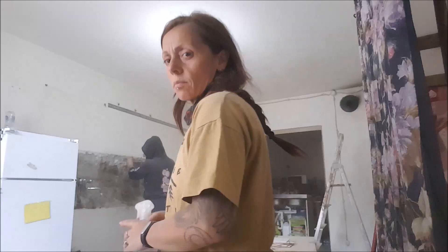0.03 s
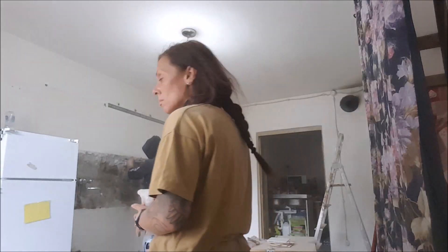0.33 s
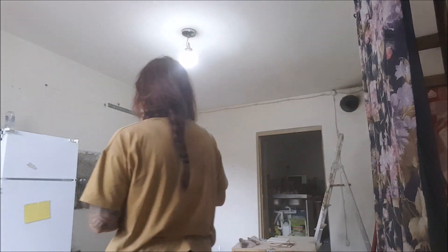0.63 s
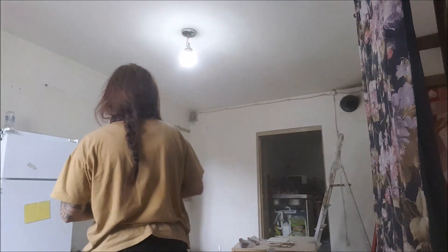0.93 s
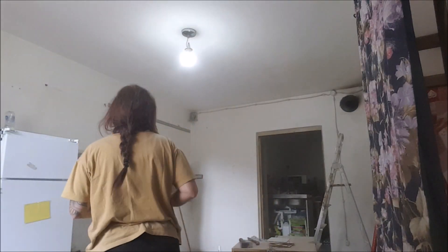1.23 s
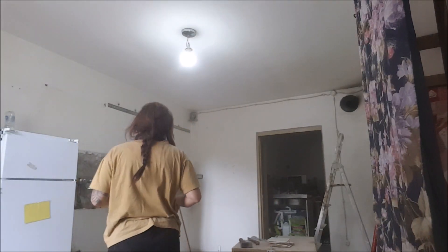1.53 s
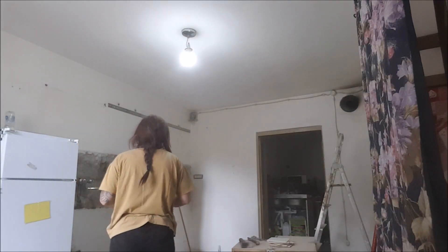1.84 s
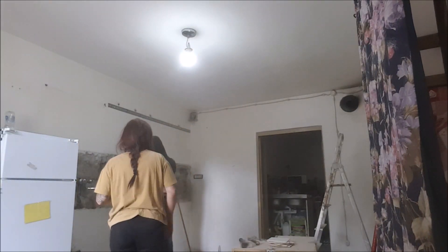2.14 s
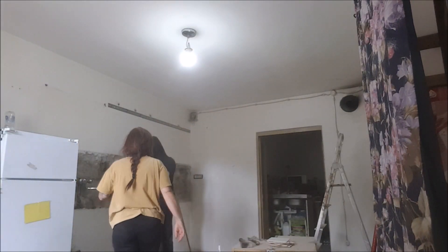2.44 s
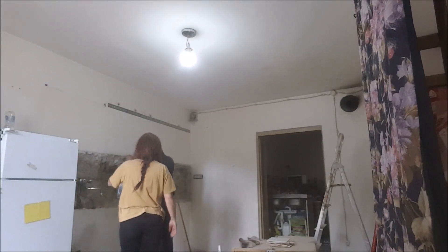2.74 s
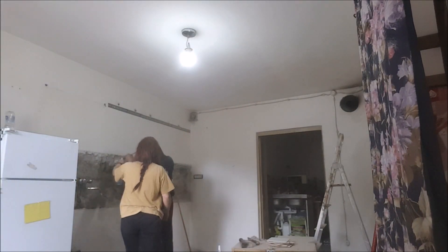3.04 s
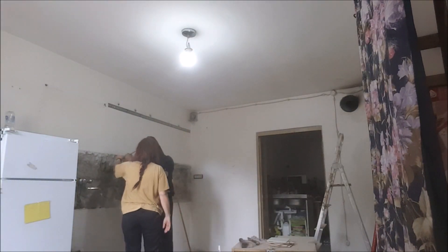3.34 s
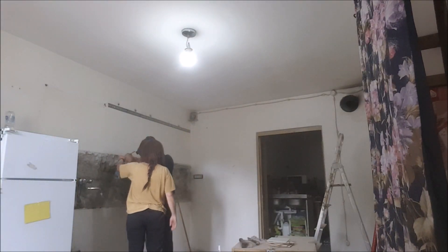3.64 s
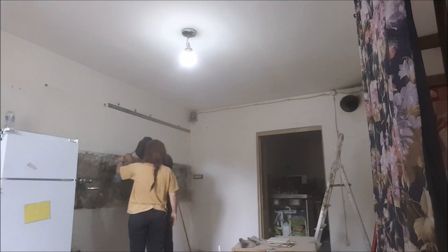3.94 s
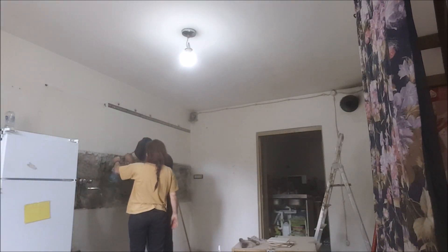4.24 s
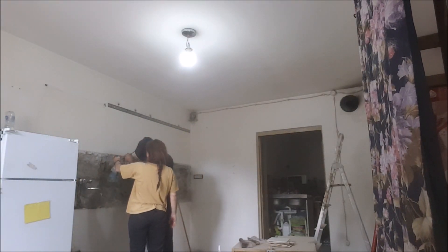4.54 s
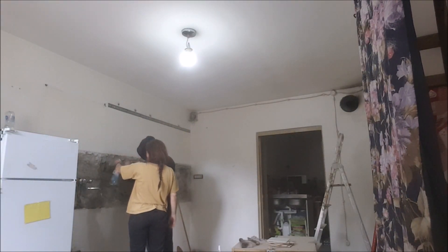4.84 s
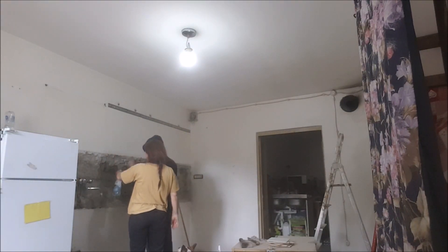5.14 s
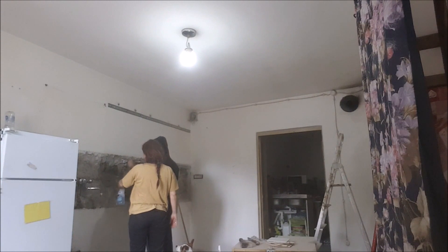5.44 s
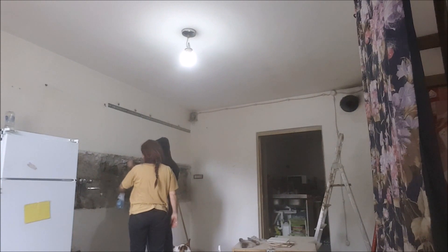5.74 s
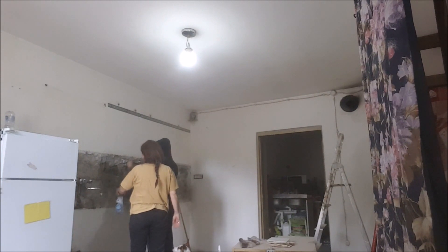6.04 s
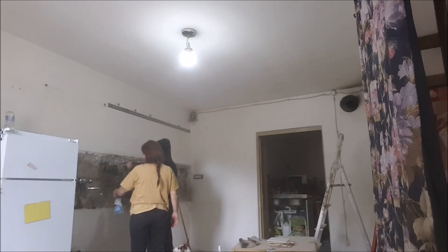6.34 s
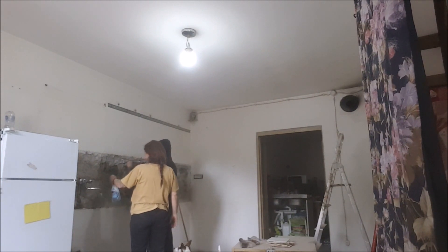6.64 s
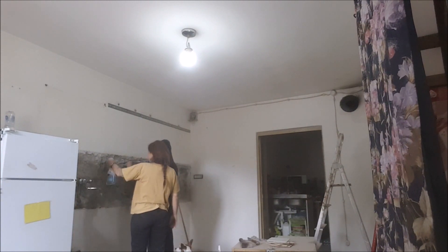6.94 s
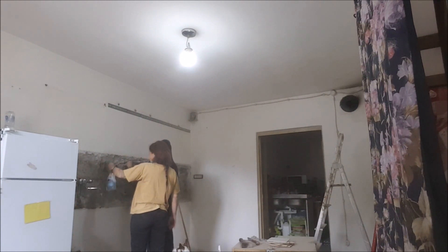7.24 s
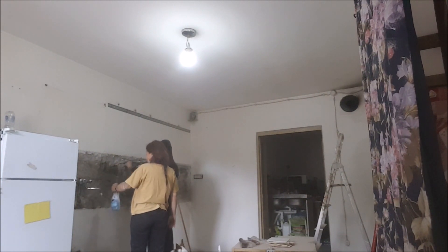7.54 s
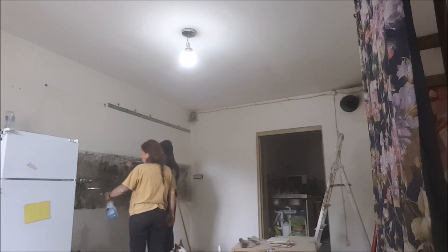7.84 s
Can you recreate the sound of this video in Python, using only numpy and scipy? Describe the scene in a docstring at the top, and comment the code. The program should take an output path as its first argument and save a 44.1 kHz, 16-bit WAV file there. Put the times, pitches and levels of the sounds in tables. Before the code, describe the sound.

A hammer and chisel crack steadily against a plaster wall, pause while a spray bottle softly pumps, then start again.

```python
"""A bare, ringing kitchen, heard in stereo from a phone a few metres off a plastered wall.
A hammer hits a chisel: the edge cracks, the steel rings, the wall thuds. A trigger bottle hisses
water on the dust twice. From 1.1 s come ten more blows, three bringing down a shower of plaster.
From 4 s the bottle pumps steadily; faint squeaks, steps and small knocks show as the hammer rests.
At 6.2 s it starts again for five last blows."""
import sys
import numpy as np
from scipy import signal
from scipy.fft import rfft, irfft, next_fast_len
from scipy.io import wavfile
from scipy.ndimage import uniform_filter1d

SR = 44100
rng = np.random.default_rng(int(sys.argv[2]) if len(sys.argv) > 2 else 0)


def transcribe(signal):
    """Save signal, clipped to [-1, 1], as a 16-bit WAV file at the path in sys.argv[1]."""
    frames = np.atleast_2d(signal).T
    limited = np.clip(frames, -1, 1)
    pcm = np.round(limited * 32767).astype(np.int16)
    wavfile.write(sys.argv[1], SR, pcm)


N = 347949
T = np.arange(SR) / SR  # one second, the life of any event
HZ = np.fft.rfftfreq(2 * SR, 1 / SR)


def amp(db):
    """Decibels to amplitude."""
    return 10 ** (np.asarray(db) / 20)


def unit(x):
    """Scale to an rms of one."""
    return x / np.sqrt(np.mean(x ** 2) + 1e-20)


def at_level(x, db):
    """Scale an event so that its first tenth of a second has this rms level."""
    return amp(db) * x / np.sqrt(np.mean(x[..., :SR // 10] ** 2) + 1e-20)


def along(points, hz):
    """Read a curve of (frequency [Hz], value) points on a log axis."""
    freqs, values = np.transpose(points)
    return np.interp(np.log(hz + 1), np.log(freqs + 1), values)


def add(track, s, x):
    """Mix x into the track from time s."""
    part = track[:, max(0, round(s * SR)):][:, :x.shape[-1]]
    part += x[..., :part.shape[1]]


def coloured(x, gain):
    """Causal (minimum phase) filter with this gain at the frequencies HZ."""
    cepstrum = irfft(np.log(np.maximum(gain, 1e-6)))
    cepstrum[1:SR] *= 2
    cepstrum[SR + 1:] = 0
    return irfft(rfft(x, 2 * SR) * np.exp(rfft(cepstrum)))[..., :SR]


def contact(crunch, life_s):
    """A sharp push, then a brief crunch of grit; crunch is its size beside the push."""
    grit = rng.standard_normal(SR) * np.exp(-T / life_s)
    return (T == 0) + crunch * grit / np.linalg.norm(grit)


# How alike the two microphones hear the room: (frequency [Hz], correlation [0-1])
MIC_LIKENESS = [(60, 0.95), (140, 0.92), (290, 0.47), (640, 0.53), (1400, 0), (15000, 0.025)]
def diffuse(size, spectrum):
    """Noise from all sides at two microphones: alike in the bass, unrelated in the treble."""
    hz = np.fft.rfftfreq(size, 1 / SR)
    turn = np.arccos(np.clip(along(MIC_LIKENESS, hz), -1, 1)) / 2
    noise = rfft(rng.standard_normal((2, size))) * amp(along(spectrum, hz))
    mid, side = irfft(noise * [np.cos(turn), np.sin(turn)], size)
    return unit(np.array([mid + side, mid - side]))


# The kitchen's decay: (frequency [Hz], t60 [s])
ROOM_DECAY = [(100, 0.87), (400, 0.57), (900, 0.53), (2500, 0.44), (4500, 0.42), (7500, 0.33), (11000, 0.3),
              (15000, 0.23)]
# At the microphones, the first wave, then a bunch from floor and ceiling: (time [s], gain [dB])
ARRIVALS = [(0, -30), (.0022, -6), (.0045, 1.5), (.006, 1.5), (.008, -2), (.012, 1.5), (.019, -2), (.06, 0)]
def in_room(x, gain):
    """Colour a source and hear it across the kitchen: two swells, then a tail whose treble dies first."""
    hz, t, bands = signal.stft(diffuse(SR, [(1, 0)]), SR, nperseg=256)
    decay = amp(-60 * t / along(ROOM_DECAY, hz)[:, None])
    tail = signal.istft(bands * decay, SR, nperseg=256)[1][:, :SR]
    response = tail * amp(np.interp(T, *np.transpose(ARRIVALS)))
    return coloured(signal.fftconvolve(x[None], response, axes=1)[:, :SR], gain)


# Still air in the kitchen: (frequency [Hz], relative density [dB])
AIR_SPECTRUM = [(25, -10), (50, -5.5), (150, -8), (400, -9), (950, -15), (2300, -22.5), (9000, -23),
                (15500, -32.5)]
# Mains hum: (frequency [Hz], level [dB])
MAINS_HUM = [(100, -73), (150, -68.5)]
def room_tone(air_db=-65):
    """Faint air all round the microphones with a trace of mains hum; it fades in at the start."""
    t = np.arange(N) / SR
    hum = sum(amp(db) * np.sqrt(2) * np.sin(2 * np.pi * hz * t) for hz, db in MAINS_HUM)
    fade_in = amp(np.interp(t, [0, .1], [-25, 0]))
    return fade_in * (amp(air_db) * diffuse(N, AIR_SPECTRUM) + hum)


# Faint squeaks: (start [s], length [s], first pitch [Hz], last pitch [Hz], relative level [dB],
# flutter [share of pitch])
FAINT_SQUEAKS = [(1.016, 0.04, 1560, 1470, -66, .09), (5.36, .22, 2317, 2043, -66.5, .04),
                 (6.002, 0.038, 2320, 2440, -69, .05), (6.508, 0.032, 1516, 1480, -66, .09)]
def squeaks(trim_db=3.5):
    """Thin, unsteady tones that glide a little as they swell and fade."""
    out = np.zeros((2, N))
    for s, length, first_hz, last_hz, db, flutter in FAINT_SQUEAKS:
        progress = np.minimum(T / length, 1)
        wobble = unit(uniform_filter1d(rng.standard_normal(SR), size=30))
        pitch = (first_hz + (last_hz - first_hz) * progress) * (1 + flutter * wobble)
        squeak = np.sin(np.pi * progress) * np.sin(2 * np.pi * np.cumsum(pitch) / SR)
        add(out, s, at_level(in_room(squeak, np.ones_like(HZ)), db + trim_db))
    return out


# Small knocks, clicks and soft steps about the room: (time [s], level [dB], centre [Hz])
SMALL_KNOCKS = [(.357, -51.5, 7500), (.52, -58, 1640), (.655, -59, 7500), (.658, -52, 160),
                (.7, -58.5, 2780), (.877, -62, 2420), (2.494, -39.5, 900), (3.697, -42, 2670),
                (5.319, -56.5, 200), (5.395, -61.5, 450), (5.638, -56, 1600), (5.909, -61.5, 160),
                (6.829, -60.5, 91)]
def knocks_and_steps(half_width_octaves=.7):
    """Each light, gritty contact sounds one broad resonance."""
    out = np.zeros((2, N))
    for s, db, hz in SMALL_KNOCKS:
        body = 1 / (1 + (np.log2((HZ + 1) / hz) / half_width_octaves) ** 2)
        add(out, s, at_level(in_room(contact(crunch=0.88, life_s=0.024), body), db))
    return out


# The nozzle's hiss: (frequency [Hz], relative density [dB])
MIST_SPECTRUM = [(150, -23.5), (400, -7), (700, -11), (1300, -6.5), (2400, -5), (5800, -12.5), (9100, -11),
                 (15500, -17)]
# Bouts of pumping: (start [s], end [s], level of the first squeeze [dB])
PUMPING = [(0.349, 0.8, -56), (3.955, 7.35, -54.5)]
def spray_bottle(every_s=.2975, squeeze_s=.12, growth_db_per_s=1.3):
    """The nozzle hisses as each squeeze's pressure swells and falls; the jet grows through a bout."""
    out = np.zeros((2, N))
    pressure = np.sqrt(np.abs(np.sin(np.pi * np.minimum(T / squeeze_s, 1))))
    for start, end, db in PUMPING:
        for s in np.arange(start, end, every_s):
            hiss = in_room(pressure * rng.standard_normal(SR), amp(along(MIST_SPECTRUM, HZ)))
            add(out, s, at_level(hiss, db + growth_db_per_s * (s - start)))
    return out


# Plaster landing: (frequency [Hz], relative density [dB])
RUBBLE_SPECTRUM = [(150, -16.5), (300, -10), (400, -9), (800, -9.5), (1150, -6), (1600, -9.5), (2500, -8),
                   (5000, -18.5), (10500, -26), (15000, -28.5)]
# Showers off the wall: (start [s], length [s], relative level [dB], rate [pieces/s])
PLASTER_SHOWERS = [(1.357, 0.066, -44, 260), (3.028, 0.13, -30.5, 610), (3.478, 0.11, -31, 600)]
def falling_plaster(spread_db=5, trim_db=-3.0):
    """Loosened pieces of many sizes patter on to the floor."""
    out = np.zeros((2, N))
    for s, length, db, rate in PLASTER_SHOWERS:
        count = int(rate * length) + 1
        landings = (rng.beta(2, 2, count) * length * SR).astype(int)
        sizes = amp(spread_db * rng.standard_normal(count)) * rng.choice([-1, 1], count)
        patter = in_room(np.bincount(landings, sizes, SR), amp(along(RUBBLE_SPECTRUM, HZ)))
        add(out, s, at_level(patter, db + trim_db))
    return out


# Low modes of the wall and the room: (frequency [Hz], relative level [dB], t60 [s])
WALL_MODES = [(31, -30, .7), (48, -22.5, 1), (61.5, -25, 1.1), (73.1, -13.5, 1), (100.4, -14.5, 1.38),
              (114, -10, 0.93), (129.5, -11, .55), (142.06, 0.5, 0.57), (151.36, 2, 0.5), (160, -4, 0.72),
              (179.8, 0.5, 0.62), (194.6, -13.5, 0.65), (209.3, -2, 0.5), (225.6, -3, 0.44),
              (245, -14, .55), (267.4, -10.5, 0.49), (363, -15.5, 0.2), (371, -12, 0.59), (370, -21, 1),
              (405, -13.5, 0.43), (450, -13.5, 0.4), (518, -19, 0.55)]
def wall_thud(hollow_db, scatter_db=1.1, rise_s=0.012, push_s=0.01095, disorder=0.72):
    """The low modes swell to one push, then beat; a hollow knock wakes the upper ones."""
    hz, db, t60 = np.transpose(WALL_MODES)[:, :, None]
    db = db + along([(200, 0.0027), (340, 0.66 * (hollow_db - 6.5))], hz)
    sizes = amp(db + scatter_db * rng.standard_normal(db.shape) - 60 * T / t60)
    # the higher the mode, the more its phase differs between blows and between microphones
    per_blow = rng.standard_normal(hz.shape)
    per_mic = rng.standard_normal((2,) + hz.shape) / 3
    phase = disorder * hz / 200 * (per_blow + per_mic)
    modes = sizes * np.cos(2 * np.pi * hz * (T - push_s) + phase)
    return np.sum(modes, axis=1) * (1 - np.exp(-T / rise_s))


def steel_ring(ring_hz, ring_db, ping_hz=7340, ping_db=4.5):
    """The chisel's power spectrum: one sharp ping, and a broader mode damped by hand and plaster."""
    def mode(hz, half_width_hz, lift_db):
        return amp(lift_db) ** 2 / (1 + ((HZ - hz) / half_width_hz) ** 2)
    ping = mode(ping_hz + rng.normal(0, 25), half_width_hz=42, lift_db=ping_db)
    return ping + mode(ring_hz, half_width_hz=44.76 + 0.0035 * ring_hz, lift_db=ring_db)


# Steel on plaster: (frequency [Hz], relative density [dB])
CRACK_SPECTRUM = [(350.0, -11.5), (480.0, -8), (680.0, -7.5), (1200.0, -3), (2000.0, 2.5), (2800.0, 2),
                  (4200.0, 0), (5400.0, -4), (7300.0, 0.6), (9000.0, -4.5), (10800.0, -11.5),
                  (12000.0, -5.5), (13200.0, -13), (15000.0, -13.5)]
def chisel_crack(hollow_db, bright_db, rebound_ms, ring_hz, ring_db, rebound_share=0.22):
    """The edge bites and the steel rings; grit gives each blow an uneven spectrum of its own."""
    bass_cut = along([(60, -22.5), (170, -6), (260, -2), (350, -2)], HZ)
    hollow = along([(450, hollow_db), (800, 0.0072)], HZ)
    treble = along([(2000, 0.0023), (7000, bright_db)], HZ)
    colour = amp(along(CRACK_SPECTRUM, HZ) + bass_cut + hollow + treble)
    grit = np.abs(rfft(contact(crunch=.33, life_s=.0018), 2 * SR)) ** 2
    steel = steel_ring(ring_hz, ring_db)
    # the chisel bounces and lands again at once, which ripples the spectrum
    rebound = np.abs(1 + rebound_share * np.exp(-2j * np.pi * HZ * rebound_ms / 1000))
    push = (T == 0).astype(float)
    return in_room(push, colour * np.sqrt(grit + steel) * rebound)


# How hollow the wall knocks where the chisel works: (time [s], crack's lift up to 450 Hz [dB])
HOLLOWNESS = [(0, 8), (1.8, 4.5), (2.9, 11.5), (4.5, 9.5), (6.2, 2.5), (7.8, 4)]
# Blows, a few metres from the microphones: (time [s], crack level [dB], thud level [dB],
# brightness [dB], rebound [ms], steel ring [Hz], ring lift [dB])
HAMMER_BLOWS = [(0.1031, -23, -26.5, -1, 0.845, 3880, 13), (1.113, -18.5, -27, 5, 1.53, 1296, 8),
                (1.484, -16, -24, 4.5, 1.1, 11500, 9), (1.84, -16.5, -21, 0.5, 0.69, 1490, 2),
                (2.2054, -15.5, -20, 1.5, 0.57, 6670, 9), (2.559, -18.5, -22, -1, 0.56, 10620, 9),
                (2.933, -18, -22.5, 1, 0.2, 1710, 1), (3.303, -16.5, -23, 1, 0.385, 1090, 9.5),
                (3.728, -17, -26, 0, 0.4, 8080, 11.5), (4.1468, -17.5, -24, 1.5, 0.42, 2920, 6.5),
                (4.547, -17.5, -22.5, 2, 0.358, 3380, 6.5), (6.187, -20.5, -33.5, -3, 0.6, 7340, 8),
                (6.5845, -20, -30, -0.5, 0.265, 1154, 12), (7.0412, -15.5, -31, 1, 0.85, 4030, 14),
                (7.452, -17, -30.5, 2.5, 0.89, 4290, 9), (7.833, -17, -26.5, 1, 0.443, 2900, 9)]
def hammering(crack_lead_s=.0018):
    """A crack, then the wall's thud; the chisel sits differently each time, so another mode rings."""
    out = np.zeros((2, N))
    for s, crack_db, thud_db, bright_db, rebound_ms, ring_hz, ring_db in HAMMER_BLOWS:
        hollow_db = np.interp(s, *np.transpose(HOLLOWNESS))
        crack = chisel_crack(hollow_db, bright_db, rebound_ms, ring_hz, ring_db)
        add(out, s - crack_lead_s, at_level(crack, crack_db))
        add(out, s, at_level(wall_thud(hollow_db), thud_db))
    return out


def scene(left_db=.35):
    """The work goes on a little left of the microphones, over the room tone."""
    work = hammering() + falling_plaster() + spray_bottle() + knocks_and_steps() + squeaks()
    return work * amp([[left_db], [-left_db]]) + room_tone()


def record(dry):
    """The phone rounds off the highest peaks and keeps nothing above its band limit."""
    ceiling, top_hz = .9, 15700
    rounded = dry / (1 + np.abs(dry / ceiling) ** 6) ** (1 / 6)
    size = next_fast_len(N + SR // 2)
    hz = np.fft.rfftfreq(size, 1 / SR)
    return irfft(rfft(rounded, size) / np.sqrt(1 + (hz / top_hz) ** 140), size)[:, :N]


dry = scene()
out = record(dry)
transcribe(out)
```